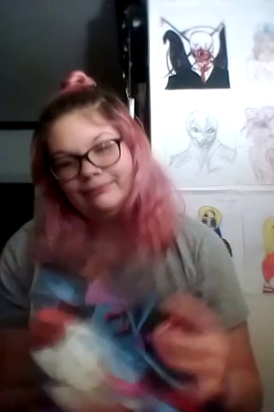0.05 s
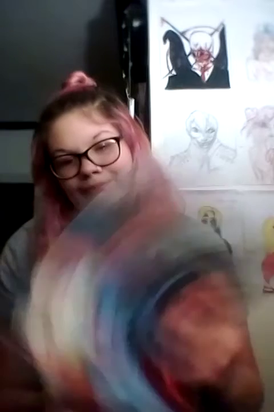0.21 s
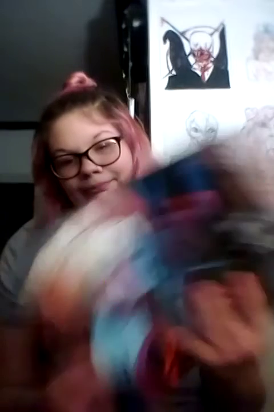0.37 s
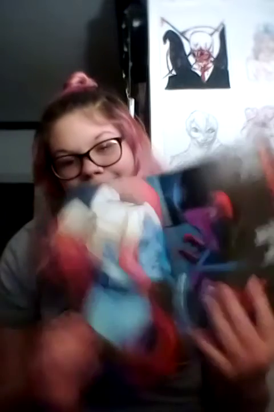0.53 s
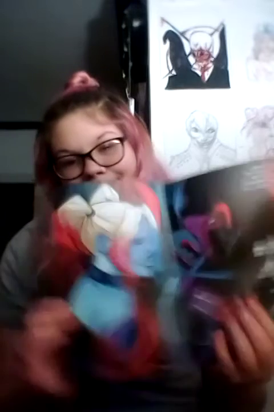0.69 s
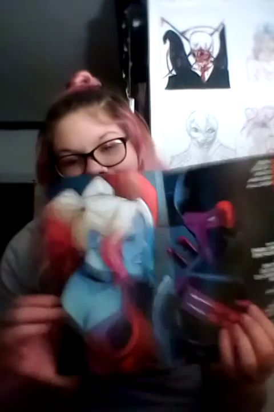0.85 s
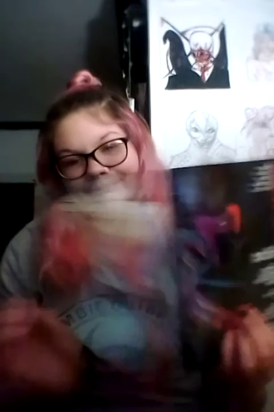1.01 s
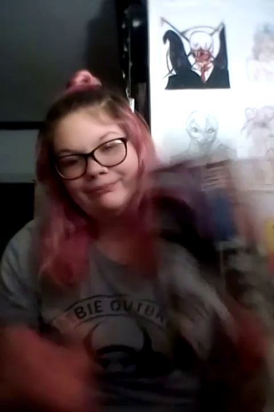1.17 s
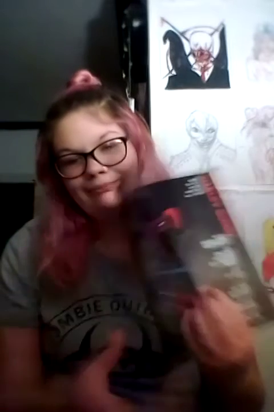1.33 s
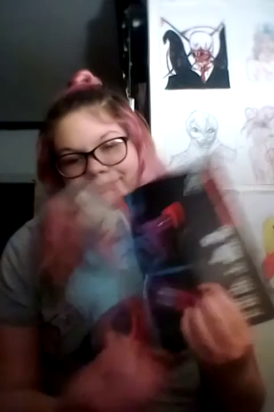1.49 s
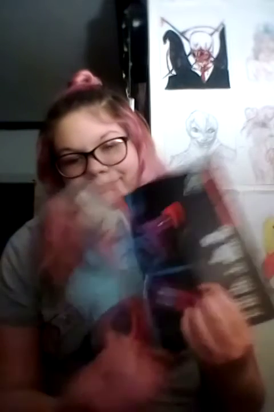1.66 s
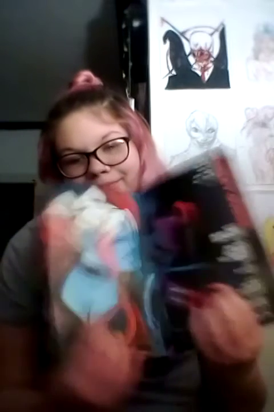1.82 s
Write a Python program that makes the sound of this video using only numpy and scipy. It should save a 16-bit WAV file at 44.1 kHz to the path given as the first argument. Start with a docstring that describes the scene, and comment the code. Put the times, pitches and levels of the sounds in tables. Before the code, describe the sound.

Glossy paper rustles close to the microphone in a small quiet room: first a quick flurry of flaps and sharp cracks, then a hollow knock as the booklet pulls taut, then lighter crinkles and rubbing fingers.

```python
"""A glossy booklet is swung up, held open and turned about, close to a microphone in a small quiet room.
Its sheets flap with soft hollow bumps, buckle with sharp snaps and slide with a fine hiss.
The cover knocks as it is pulled taut, and the spine ticks as it opens.
Fingers rub the cover and hands rustle, over the faint steady noise of the room's air."""
import sys
import numpy as np
from scipy import signal
from scipy.fft import rfft, irfft, next_fast_len
from scipy.io import wavfile

SR = 44100
rng = np.random.default_rng(int(sys.argv[2]) if len(sys.argv) > 2 else 0)


def output_pcm(signal):
    """Save a mono or channel-first signal as 16-bit PCM at the path in sys.argv[1].

    Samples are clipped to [-1, 1] before scaling.
    """
    pcm = np.clip(np.atleast_2d(signal).T, -1, 1) * 32767
    wavfile.write(sys.argv[1], SR, np.round(pcm).astype(np.int16))


N = 81585
T = np.arange(N) / SR
AGE = T[:SR // 3]  # seconds since one short sound began

# the hiss of glossy paper: (frequency [Hz], level [dB])
PAPER_HISS = [(200, -38), (700, -21), (1100, -22.5), (2400, -13), (3300, -9.5), (6500, -8), (8000, -4.5),
              (9500, 2.5), (10800, -3.5), (12000, -9), (14000, -6)]


def flaps():
    """A flapping sheet bends to and fro, flutters around that pitch and pushes a puff of air."""
    # each flap: (time [s], level [dB], pitch [Hz], rise [s], fade time [s])
    bumps = [(.106, -50, 367, 0.0015, 0.094), (.128, -40.5, 337, .001, 0.029),
             (0.177, -39, 451, .004, 0.066), (0.2, -27, 417, 0.0024, 0.056),
             (.207, -23.5, 340, 0.0012, 0.036), (.224, -18.5, 349, 0.0016, 0.039),
             (.229, -21, 500, 0.0037, 0.037), (.25, -41, 392, 0.0021, 0.035),
             (0.26, -33, 534, 0.0015, 0.018), (.328, -27.5, 402, 0.0012, 0.057),
             (.343, -37.5, 444, 0.0023, .04), (.383, -38, 176, 0.0018, .08),
             (0.398, -44.5, 434, 0.0038, 0.076), (.659, -40.5, 600, 0.0011, 0.037),
             (.787, -37.5, 424, 0.00036, 0.035), (.855, -28, 323, 0.0017, 0.06),
             (.923, -43, 398, 0.0044, 0.037), (1.006, -31.5, 406, 0.0018, 0.055),
             (1.012, -46.5, 768, .004, 0.096), (1.032, -38.5, 275, 0.0033, 0.08),
             (1.13, -35.5, 258, 0.0013, 0.042), (1.141, -40, 289, 0.0031, 0.088),
             (1.344, -60.5, 370, 0.0082, 0.15), (1.474, -38.5, 362, 0.0023, 0.079),
             (1.51, -33.5, 370, 0.0016, 0.022), (1.524, -36, 486, 0.00084, 0.056),
             (1.532, -35, 381, 0.00071, 0.067), (1.551, -45, 194, 0.003, 0.096),
             (1.593, -40, 240, .001, 0.046), (1.609, -39.5, 408, 0.0015, 0.028),
             (1.618, -37.5, 488, .001, 0.043), (1.622, -42, 211, 0.0015, 0.044),
             (1.671, -49.5, 505, 0.003, 0.16), (1.711, -47, 413, 0.0023, 0.051),
             (1.72, -50, 213, .003, 0.051), (1.793, -44, 444, 0.00065, .025),
             (1.832, -33, 497, 0.0046, .08)]
    # the tone of the flutter: (frequency [times the pitch], level [dB])
    flutter_shape = [(.08, -30), (.2, -17), (.35, -9), (.6, -4), (.9, -4.5), (1.25, 0.5), (1.6, -13),
                     (2.1, -22.5), (3, -17.5), (7, -47), (20, -68)]
    puff_hz = 158
    out = np.zeros(N)
    for s, db, hz, rise, t60 in bumps:
        note = (amp(-1.5) * sine(hz) + amp(-15) * sine(puff_hz)) * swell(rise, t60)
        spectrum = [(k * hz, level) for k, level in flutter_shape]
        flutter = amp(-7.5) * burst(noise(spectrum, len(AGE)), swell(rise, t60 * 1.34))
        add(out, s, amp(db) * in_room(note + flutter, wet_db=-11.5))
    return out


def snaps():
    """Paper buckles with a crack, a very short high ring and a crinkle."""
    # each buckle: (time [s], level [dB], ring pitch [Hz], ring over crack [dB], fade time [s])
    buckles = [(0.1997, -30, 9600, -13, 0.014), (0.2095, -33, 9500, -6, .012), (0.211, -29, 8400, 1, .012),
               (.216, -27, 9500, -6, 0.011), (.221, -15, 9580, 8, 0.0032), (.2219, -17.5, 11230, 7, 0.0023),
               (0.2224, -18, 10600, 4, 0.0044), (.2295, -41, 9200, -6, 0.017),
               (0.258, -41.5, 7660, 3, 0.011), (0.3232, -26, 9150, -7, 0.0037),
               (.342, -38, 10100, -17, 0.027), (0.3643, -41, 6400, -4, 0.017),
               (0.382, -41, 13000, -4, 0.02), (.7873, -43.5, 5050, 0, .012), (0.854, -31, 11400, -3, 0.029),
               (.872, -43.5, 7800, -10, 0.0081), (1.006, -48, 10160, 11.5, 0.019),
               (1.091, -42, 4500, -4, 0.012), (1.473, -32, 8800, 9.5, 0.011),
               (1.4734, -32, 11600, 3.5, 0.018), (1.4753, -43.5, 4160, 0.5, 0.0065),
               (1.481, -41, 9100, 9.5, 0.012), (1.5928, -30.5, 4960, -23, 0.0026),
               (1.637, -49, 9100, 1.5, 0.014), (1.674, -41.5, 9800, -2, 0.012),
               (1.7223, -42.5, 9100, -16, 0.011)]
    # the tone of a crack: (frequency [Hz], level [dB])
    crack_spectrum = [(100, -29), (500, -14.5), (1200, 4.5), (2500, -4.5), (4000, -2.5), (5500, -3.5),
                      (7000, 2), (9500, 6), (12000, -5.5), (14000, -4)]
    out = np.zeros(N)
    for s, db, hz, ring_db, t60 in buckles:
        crack = burst(noise(crack_spectrum, len(AGE)), fade(t60))
        crinkle = amp(-11) * burst(noise(PAPER_HISS, len(AGE), grain_db=4), fade(0.031))
        ping = amp(ring_db) * crease_tone(hz) * swell(0.00015, t60)
        add(out, s, amp(db) * (in_room(crack + crinkle, wet_db=-10.5) + in_room(ping, wet_db=-14)))
    return out


def crease_tone(hz, drift_hz=895, turns_per_s=2010):
    """A buckle's pitch wanders while the crease moves."""
    turns = rng.standard_normal(len(AGE))
    drift = np.interp(AGE * turns_per_s, np.arange(len(AGE)), turns)
    return np.sin(2 * np.pi * np.cumsum(hz + drift_hz * drift) / SR)


def cover_knocks():
    """The taut cover gives a hollow knock, and a nearby surface echoes it."""
    # each knock: (time [s], level [dB])
    knocks = [(.2235, -27), (0.8547, -21), (1.007, -44.5), (1.675, -52), (1.793, -54)]
    # the notes the cover rings with: (pitch [Hz], level [dB], fade time [s])
    cover_notes = [(203, -20, 0.2), (544, -7.5, 0.023), (720, -15.5, 0.065), (945, -4.5, 0.05),
                   (1100, 1, 0.013), (1196, -3.5, 0.056), (1402, -8.5, 0.017), (2420, -9, 0.0081)]
    echo_s, echo_db = 0.005015, -11
    out = np.zeros(N)
    for s, db in knocks:
        knock = amp(db) * in_room(low_cut(ring(cover_notes), hz=250), wet_db=-11)
        add(out, s, knock)
        add(out, s + echo_s, amp(echo_db) * knock)
    return out


def slides():
    """Glossy sheets hiss as they slide over each other."""
    # one list of points for each slide: (time [s], level [dB])
    strokes = [
        [(0, -42.5), (.045, -39), (.085, -48), (.13, -54.5), (.165, -48), (.2, -51.5), (.23, -30.5),
         (.25, -49.5), (.31, -58)],
        [(.385, -50.5), (.405, -43.5), (.44, -43.5), (.52, -44.5), (.65, -48), (.74, -49.5), (.8, -53.5),
         (.84, -49), (.892, -42.5), (.915, -55.5)],
        [(1.005, -53.5), (1.04, -54.5), (1.09, -51.5), (1.11, -90)],
        [(1.465, -59), (1.472, -52), (1.495, -58), (1.52, -46), (1.57, -52), (1.62, -59), (1.665, -58.5),
         (1.7, -57)],
        [(1.77, -56.5), (1.815, -57), (1.85, -46)],
    ]
    level = sum(amp(np.interp(T, *np.transpose(stroke), left=-120, right=-120)) for stroke in strokes)
    return level * noise(PAPER_HISS, N, grain_db=1.5)


def finger_rubs():
    """Fingers rub the cover in short, rough strokes."""
    # each rub: (time of peak [s], level [dB], time to rise 20 dB [s], time to fall 20 dB [s])
    strokes = [(.184, -37, 0.037, 0.017), (0.212, -41.5, 0.014, 0.034), (0.259, -44, 0.0091, 0.037),
               (.398, -53, .006, 0.036), (0.788, -51.5, 0.0024, 0.063), (1.017, -50, 0.0088, 0.039),
               (1.08, -48, 0.072, 0.044), (1.518, -48.5, .02, 0.012), (1.677, -46, 0.0041, 0.01),
               (1.722, -51, 0.0083, 0.013), (1.796, -53.5, .001, 0.01), (1.845, -47.5, 0.017, .04)]
    # the tone of rubbing: (frequency [Hz], level [dB])
    rub_spectrum = [(100, -26), (350, 3.5), (800, -2.5), (1150, 2.5), (1700, -4), (3000, -5.5), (6000, -9),
                    (9000, -8), (14000, -17)]
    level = sum(amp(db - 20 * np.maximum((s - T) / rise, (T - s) / fall))
                for s, db, rise, fall in strokes)
    return in_room(level * noise(rub_spectrum, N, grain_db=3), wet_db=-8)


def spine_ticks():
    """The fold slips in a few quick, dry ticks as it opens."""
    # each tick: (time [s], level [dB])
    ticks = [(.6573, -31), (0.6586, -29.5), (0.6686, -35.5)]
    # the notes the spine rings with: (pitch [Hz], level [dB], fade time [s])
    spine_notes = [(597, -21, 0.021), (1110, -16, 0.013), (1550, -15, 0.0087), (2260, -6.5, 0.0099),
                   (2920, -0.5, 0.0099), (3070, -0.5, 0.0067), (5530, -13, 0.0067)]
    # the scrape under a tick: (frequency [Hz], level [dB])
    scrape_spectrum = [(100, -15), (500, -14), (1500, 4.5), (2300, 5), (3200, 5), (4000, -9), (9000, -27)]
    out = np.zeros(N)
    for s, db in ticks:
        scrape = amp(-7) * noise(scrape_spectrum, len(AGE)) * fade(0.017)
        tick = low_cut(ring(spine_notes), hz=397)
        add(out, s, amp(db) * in_room(tick + scrape, wet_db=-12.5))
    return out


def hand_rustle():
    """Hands shift on the booklet with a dull, uneven rustle."""
    # how loud the rustle is: (time [s], level [dB])
    loudness = [(0, -52.5), (.07, -54), (.12, -46.5), (.17, -51), (.3, -60), (.45, -63.5), (.53, -65.5),
                (1.3, -59.5), (1.37, -59), (1.45, -67), (1.56, -63), (1.72, -61.5), (1.77, -68),
                (1.85, -45)]
    # its tone: (frequency [Hz], level [dB])
    rustle_spectrum = [(50, -40), (140, -15.5), (260, -2), (350, -2.5), (500, -5.5), (700, -16.5),
                       (1150, -14), (2000, -18), (5000, -43)]
    return amp(np.interp(T, *np.transpose(loudness))) * noise(rustle_spectrum, N, grain_db=6.5)


def room_air():
    """The room's air makes a faint, steady noise."""
    # its tone: (frequency [Hz], level [dB])
    air_spectrum = [(25, 2), (50, 1), (90, -17), (140, 1.5), (280, 1), (450, -7), (700, -8.5), (1300, -6),
                    (3000, -13), (4300, -13), (6000, -16), (9500, -12.5), (14000, -18.5)]
    return amp(-58.5) * noise(air_spectrum, N)


def in_room(x, wet_db, gap_s=0.004):
    """Add the room's echo at level wet_db, new each time because the booklet keeps moving."""
    # how long the echo lasts: (frequency [Hz], fade time [s])
    echo_times = [(150, 0.38), (500, 0.21), (1400, 0.21), (4000, 0.14), (10000, 0.12)]
    hz, t, bands = signal.stft(rng.standard_normal(len(AGE)), SR, nperseg=256)
    tail = signal.istft(bands * fade(along(echo_times, hz)[:, None], t), SR)[1]
    tail = np.pad(tail / np.linalg.norm(tail), (int(gap_s * SR), 0))
    return x + amp(wet_db) * signal.fftconvolve(x, tail)[:len(x)]


def amp(db):
    """Turn decibels into a multiplier."""
    return 10 ** (np.asarray(db) / 20)


def along(points, hz):
    """Read between (frequency, value) points, with octaves evenly spaced."""
    f, v = np.transpose(points)
    return np.interp(np.log(hz + 1), np.log(f + 1), v)


def filtered(x, response):
    """Multiply each frequency in x by response(hz)."""
    size = next_fast_len(len(x) + 8192)
    return irfft(rfft(x, size) * response(np.fft.rfftfreq(size, 1 / SR)), size)[:len(x)]


def low_cut(x, hz):
    """Turn down the bass below hz."""
    return signal.sosfilt(signal.butter(2, hz, "highpass", fs=SR, output="sos"), x)


def noise(spectrum, size, grain_db=0):
    """Noise of the given tone and average power 1; more grain_db makes it rougher."""
    white = rng.standard_normal(size)
    grain = amp(grain_db * np.repeat(rng.standard_normal(size // 8 + 1), 8)[:size])
    x = filtered(white * grain, lambda hz: amp(along(spectrum, hz)))
    return x / np.sqrt(np.mean(x ** 2) + 1e-20)


def fade(t60, t=AGE):
    """Die away by 60 dB in t60 seconds, the fade time."""
    return np.exp(-np.log(1000) * t / t60)


def swell(rise, t60):
    """Rise softly to 1, then die away."""
    shape = (1 - np.exp(-(AGE / rise) ** 2)) * fade(t60)
    return shape / shape.max()


def burst(x, shape):
    """Give noise the outline and the energy of a loudness shape."""
    return x * shape * np.linalg.norm(shape) / np.linalg.norm(x * shape)


def sine(hz):
    """A pure tone."""
    return np.sin(2 * np.pi * hz * AGE)


def ring(notes):
    """A struck sheet's fading notes; neighbours swing opposite ways, so little bass escapes."""
    return sum((-1) ** k * amp(db) * fade(t60) * sine(hz) for k, (hz, db, t60) in enumerate(notes))


def add(track, s, x):
    """Mix x into the track at s seconds."""
    part = track[round(s * SR):][:len(x)]
    part += x[:len(part)]


def scene():
    """The booklet over the room's steady air, in one channel."""
    rubbing = slides() + finger_rubs() + hand_rustle()
    return (rubbing + snaps() + flaps() + cover_knocks() + spine_ticks() + room_air())[None]


def record(dry):
    """The small microphone thins the bass and cuts off the highest treble."""
    bass_hz, top_hz = 132, 14100
    return filtered(dry[0], lambda hz: 1j * hz / (bass_hz + 1j * hz) * (hz < top_hz))[None]


dry = scene()
out = record(dry)
output_pcm(out)
```